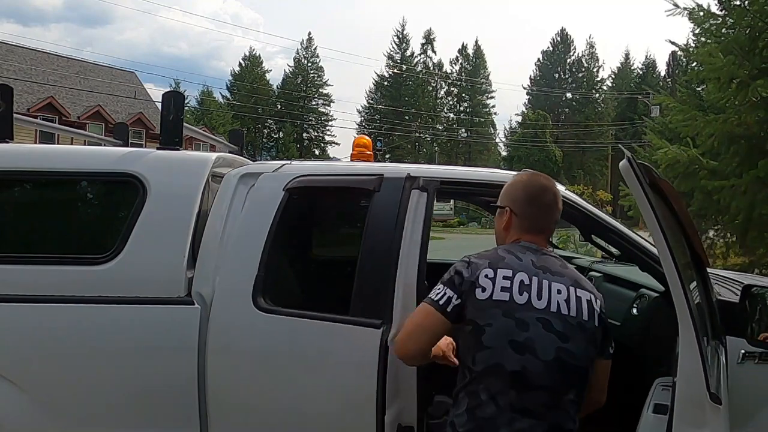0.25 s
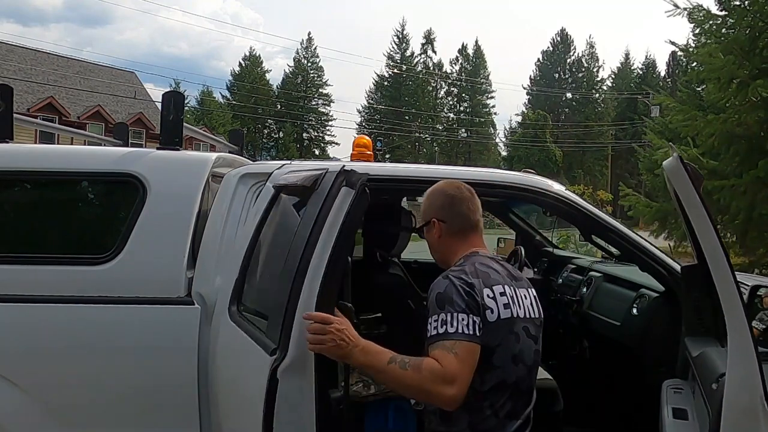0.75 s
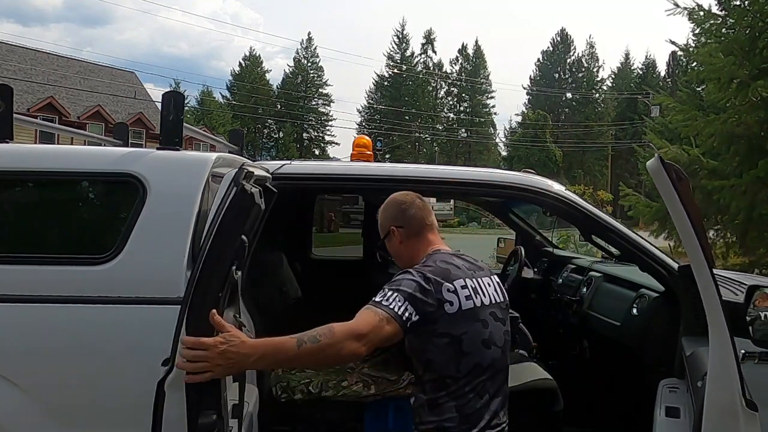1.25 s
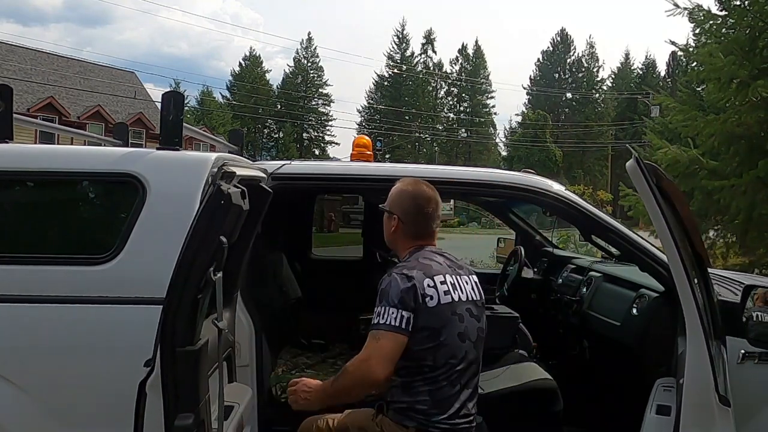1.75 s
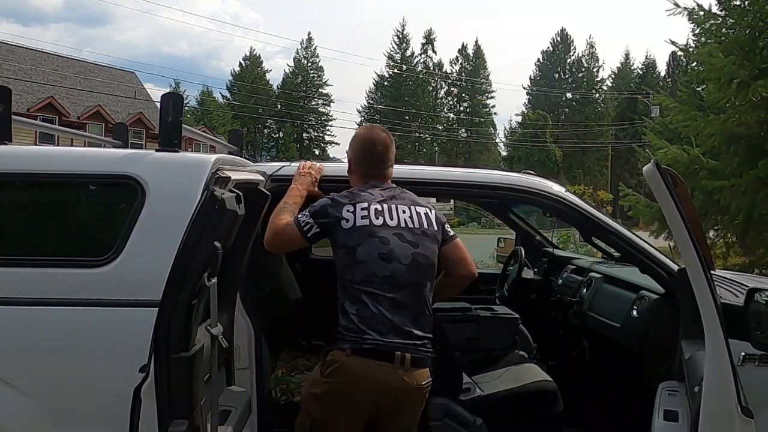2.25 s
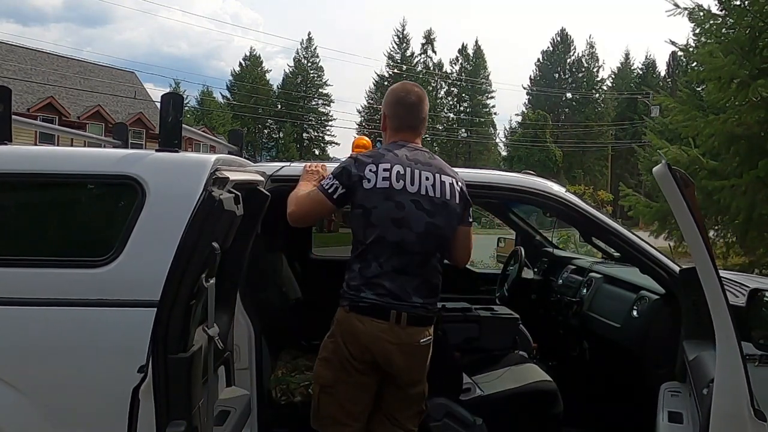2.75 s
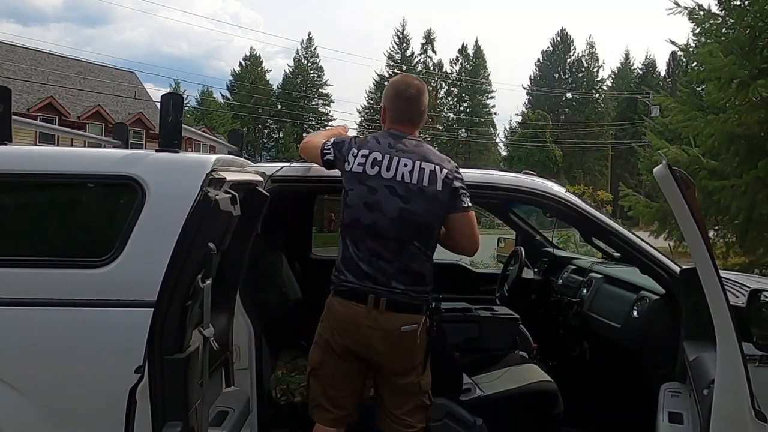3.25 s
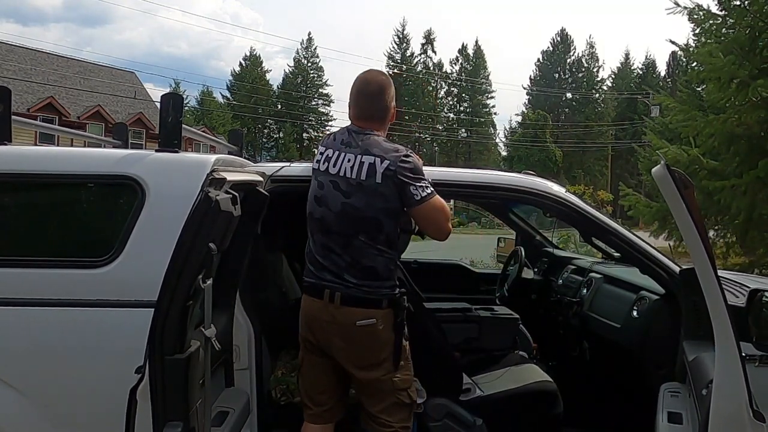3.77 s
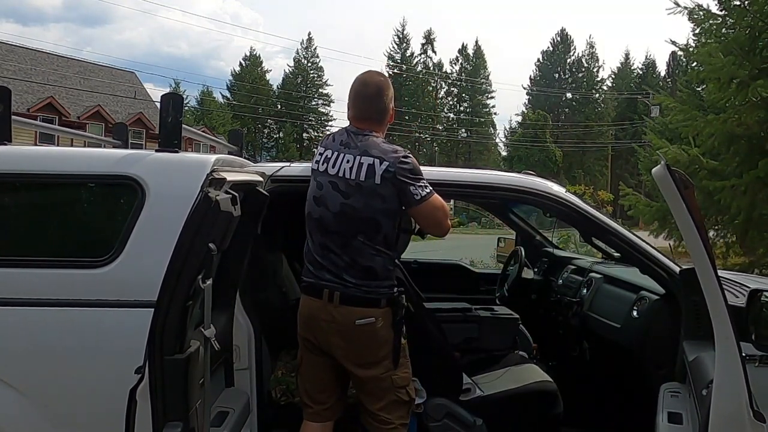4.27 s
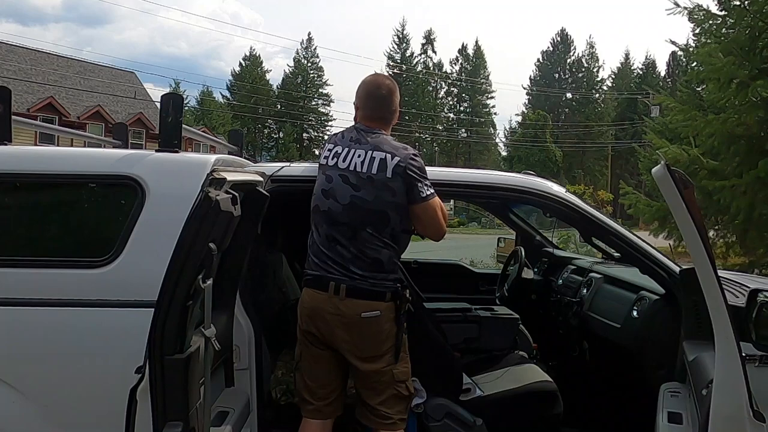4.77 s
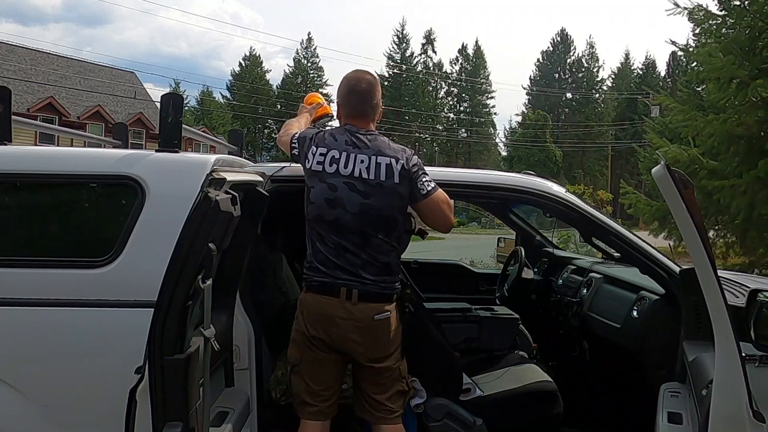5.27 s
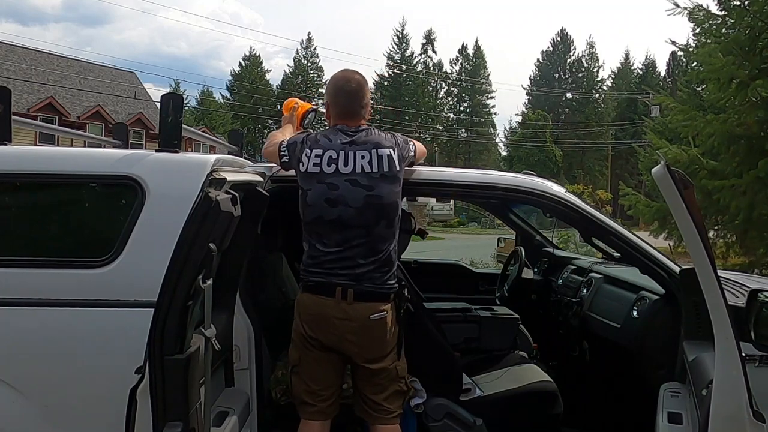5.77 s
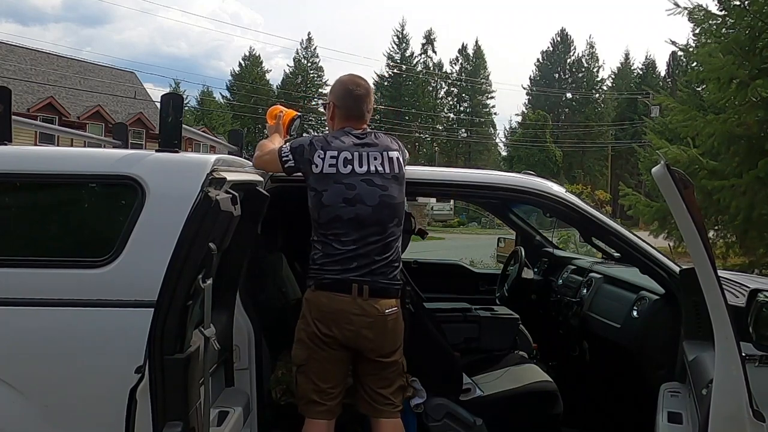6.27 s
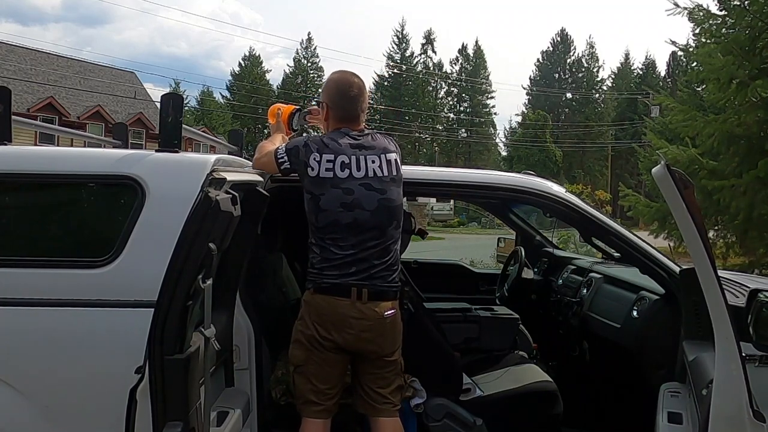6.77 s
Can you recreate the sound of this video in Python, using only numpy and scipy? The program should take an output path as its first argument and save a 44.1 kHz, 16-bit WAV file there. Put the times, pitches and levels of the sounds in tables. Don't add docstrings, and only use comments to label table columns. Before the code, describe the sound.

Heard from a few metres away outdoors: a thud, then the hard double click of a pickup door, small knocks and swishes of cloth. A bright ringing clack lands a little later, followed by scattered hand and boot bumps. Near the end, hollow sheet-metal clunks burst out as a magnet lets go. A low motor drone rises slightly throughout, with soft traffic hiss.

```python
import sys
import numpy as np
from scipy import signal
from scipy.fft import rfft, irfft, next_fast_len
from scipy.io import wavfile
from scipy.ndimage import uniform_filter1d

SR = 44100
rng = np.random.default_rng(int(sys.argv[2]) if len(sys.argv) > 2 else 0)


def output_pcm(signal):
    pcm = np.clip(np.atleast_2d(signal).T, -1, 1) * 32767
    wavfile.write(sys.argv[1], SR, np.round(pcm).astype(np.int16))


def to_linear_factor(level_db):
    exponent = np.asarray(level_db, float) / 20
    return 10 ** exponent


N = 309582
T = np.arange(N) / SR

# (frequency [Hz], level [dB per Hz])
AIR_SPECTRUM = [(15, -27.5), (30, -17), (60, -13.5), (140, -12.5), (200, -20), (300, -24.5), (420, -27.5),
                (700, -33), (1200, -29), (2280, -34.5), (3230, -43.5), (4460, -48), (12000, -76),
                (16000, -110)]
# (frequency [Hz], difference [dB])
FAR_SIDE = [(200, 0), (380, 1), (700, 2.5), (1300, 4.5), (2400, 7.5), (4400, 5), (8100, 1), (15000, 0)]
# (time [s], shaft rate [Hz])
ENGINE_SPEED = [
    (0, 24.1),
    (1.4, 24.06),
    (2, 25.01),
    (2.5, 25.41),
    (3, 25.89),
    (4, 26.14),
    (7.02, 26.39),
]
# (multiple of shaft rate [1], level at the nearest [dB], later fading [dB/s])
STRONG_ORDERS = [(2, -38, 3), (3, -44, 6.5), (3.5, -47, 0.25), (5, -44, 1.6), (6, -53.5, 0.5),
                 (7, -58, 1.4), (8, -68, 0), (10, -59, 12), (10.5, -68, 0), (13.5, -72, 0), (16.5, -69, 5),
                 (19, -73, -0.64)]
# (multiple of shaft rate [1], relative level [dB])
WEAK_ORDERS = [(1, -13.5), (4, -20.5), (9, -33.5), (11, -28), (12, -28.5), (14, -24.5)]
# (time [s], depth [dB])
SHADE_DIPS = [
    (.76, 19),
    (1.26, 12),
]

# (start [s], length [s], level [dB])
MOVEMENTS = [(0.397, 3.4, -83.5), (0.797, 0.17, -74.5), (1.236, 0.027, -83.5), (1.454, 0.074, -72),
             (1.682, 0.16, -69.5), (2.212, 0.3, -70.5), (2.713, .1, -74), (3.1, .06, -75.5),
             (3.389, .04, -84), (3.66, .13, -81.5), (4.942, .8, -80.5), (6.303, 0.064, -75.5),
             (6.724, 0.026, -79), (6.9, .12, -89)]
# (frequency [Hz], level [dB per Hz])
CLOTH_SPECTRUM = [(1200, -16.5), (2500, 6.5), (5000, 0), (8000, -7.5), (12000, -21), (16000, -27)]
# (frequency [Hz], difference [dB])
NEAR_SIDE = [(150, 0), (400, -1), (1300, -1.2), (2400, .5), (4400, -1.5), (8100, -3.5), (15000, -2)]
# (time [s], peak [dB], centre [Hz], width [octaves], t60 [s])
TICKS = [(.745, -53, 4500, 0.88, 0.026), (0.87, -50, 3500, 1.1, .015), (2.281, -32.5, 7970, 1.1, .015),
         (6.735, -46, 2600, 0.58, 0.025), (5.479, -51, 12000, 0.59, .06), (0.884, -34, 2200, 1.9, 0.008),
         (0.893, -36.5, 1980, 1.6, 0.011), (.416, -33.5, 3660, 1.3, 0.029), (1.546, -54, 8100, 0.66, 0.016),
         (1.858, -42, 3300, .9, 0.061), (2.368, -56, 14000, .4, .04), (2.33, -57, 14500, .3, .04),
         (5.48, -56, 14000, .4, .04), (2.2791, -28, 7600, .8, .04), (2.368, -45, 9500, .9, 0.048),
         (3.19, -63, 5250, 0.43, .12), (3.371, -64, 6900, 1.1, .016), (3.699, -58.5, 7200, 1.5, 0.09),
         (5.036, -30, 2300, 2.6, 0.0047), (5.202, -52.5, 9300, 0.76, .06), (5.479, -41, 9000, .8, 0.067),
         (2.329, -47, 12000, .7, .03), (2.272, -46, 11500, .6, .02), (.885, -55, 9000, .8, .012),
         (4.866, -63, 5300, .5, .03), (2.69, -55, 4200, 1, .04), (2.757, -66, 7000, 1.3, .04),
         (0.002, -59, 9000, 1.2, .05), (5.675, -62, 4500, 1.5, .02), (6.335, -41.5, 6100, 1.83, 0.062),
         (6.32, -68, 10500, .7, .05), (6.875, -71, 8800, .65, 0.026), (6.89, -64, 7600, .6, .029),
         (6.898, -58, 6300, 1.1, .016), (6.925, -58.5, 8700, .65, 0.047)]

# (time [s], peak [dB], frequency [Hz], t60 [s])
PINGS = [(0, -32.5, 795, 0.079), (.306, -50, 2570, .03), (.395, -29.5, 699, 0.13), (.396, -33.5, 1483, .1),
         (.417, -31.5, 1060, 0.044), (.417, -29, 738, 0.084), (2.49, -51, 4050, 0.063),
         (2.638, -43, 1160, 0.025), (2.688, -42, 654, 0.048), (2.978, -47.5, 1400, 0.05),
         (3.152, -52, 860, 0.041), (3.7, -57, 4010, 0.11), (4.965, -33.5, 1196, 0.031),
         (4.995, -48, 1790, .06), (.68, -47, 1200, 0.027), (5.037, -25, 1256, .018),
         (5.205, -23.5, 858, 0.11), (5.4785, -13, 1800, 0.008), (5.466, -28, 1500, .04),
         (2.273, -26, 1650, .03), (2.2795, -17, 1900, .035), (2.329, -36, 1700, .05),
         (2.33, -37, 2300, .07), (2.367, -37, 2400, .05), (.885, -46, 1150, .02), (.395, -32, 770, .04),
         (.742, -50, 430, .06), (2.598, -50, 400, .05), (2.002, -48, 1650, .03), (2.638, -50, 760, .03),
         (3.153, -50, 1650, .03), (1.858, -50, 4400, .04), (5.785, -58, 2900, .03),
         (6.735, -43, 2560, 0.026)]
# (frequency [Hz], level [dB], t60 [s])
STRIKER_MODES = [(1157, -5.5, .13), (1437, -0.5, .09), (1840, 1, 0.011), (2277, -4, .09), (3090, -12, .15),
                 (3348, -12, .11), (4016, -7, 0.11), (4549, -7, .06), (5071, -13, .09), (5717, -5, .046),
                 (6040, -11, .07), (7413, -20, .1), (8597, -23, .1), (9378, -27, .14)]
# (frequency [Hz], level [dB], t60 [s])
BUCKLE_MODES = [(921, 0, .07), (2842, -12, .2), (3343, -2, .08), (3844, -7, .084), (4549, -8, .1),
                (5157, -8, .088), (5922, -8, .087), (8323, -14, .083)]
# (time [s], peak [dB], upper modes [dB])
BUCKLE_BOUNCES = [
    (2.328, -38, 1),
    (2.334, -40, 2),
    (2.3666, -36, 1.5),
]
# (frequency [Hz], level [dB], t60 [s])
HANDLE_MODES = [(705, 0, .15), (1114, -5, .12), (1281, -7, .13), (2304, -16, .15), (2503, -8, .097),
                (2853, -11, .12), (3047, -13, .12), (3935, -13, .094), (4630, -17, .12)]
# (time [s], peak [dB], upper modes [dB])
HANDLE_PULLS = [
    (.3955, -34, 0),
    (.416, -36, -2),
]
# (frequency [Hz], level [dB], t60 [s])
BASE_MODES = [(468, -6, .25), (759, -10, .15), (890, -4, .09), (1077, -6, .15), (1238, -6, .09),
              (2040, -8, .08), (2250, -14, .14), (2632, -6, .07), (2778, -11, .09), (3015, -9, .055),
              (3418, -11, .08), (3553, -15, .1), (3830, -15, .08), (4436, -20, .1)]
# (time [s], peak [dB], upper modes [dB])
BASE_ROCKS = [(5.02, -33, -6), (5.048, -33, -12), (5.203, -26, -4), (5.225, -29, -8), (5.408, -24, -3),
              (5.42, -21, -13), (5.443, -30, 0), (5.462, -27, -3), (5.479, -30, 6), (5.486, -30, 4),
              (5.518, -31, -1)]
# (frequency [Hz], level [dB], t60 [s])
MAGNET_MODES = [(9383, 0, .17), (9394, -9, .22), (10920, -14, .05), (11510, -18, .04), (11830, -20, .05),
                (13290, -36, .3), (14620, -19, .4)]

# (time [s], peak [dB], frequency [Hz], t60 [s])
THUDS = [(0, -24.5, 130, 0.17), (0, -19.5, 263, 0.024), (.03, -38, 330, .2), (.02, -37.5, 207.6, 0.43),
         (2.08, -31.5, 48.3, 0.77), (2.75, -38.5, 34.6, 0.54), (5.21, -30, 497, .12),
         (5.495, -21, 305, 0.16), (5.485, -16, 122, .1), (5.474, -23, 225, .06), (5.495, -24, 195, .12),
         (5.52, -27, 155, .15), (5.515, -23, 320, .09), (5.225, -30, 140, .12), (2.284, -32, 500, .06),
         (2.29, -30, 92, .12), (2.375, -32, 90, .1), (.46, -37, 140, .35), (.48, -45, 320, .25),
         (.362, -40, 330, .05), (.08, -42, 220, .2), (4.998, -33, 210, .08), (5.497, -19, 358, .1),
         (5.464, -27, 330, .05), (5.085, -24, 122, .09), (5.205, -29, 125, .08), (5.405, -31, 335, .08),
         (5.205, -35, 312, .1), (5.02, -35, 250, .2), (2.285, -31, 340, .1), (2.785, -32, 92, .12)]
# (frequency [Hz], level [dB], t60 [s])
DOOR_LOW_MODES = [(96, 2.5, 0.14), (155, 3, 0.13), (209, -12, 0.37), (251.6, -6.5, .22), (310, -11.5, .16)]
# (time [s], peak [dB], upper modes [dB])
DOOR_SPRINGS = [
    (.404, -24, 0.2),
    (.436, -27, -6.5),
]
# (frequency [Hz], level [dB], t60 [s])
CAB_MODES = [(56, 0.5, 0.4), (49.5, -9.5, 0.33), (109, -1, 0.21), (163, -8, 0.38), (198.4, -12.5, 0.41)]
# (time [s], peak [dB], upper modes [dB])
ROOF_FLEXES = [
    (5.018, -30, -4),
    (5.086, -15.5, -8),
    (5.209, -15, -15),
    (5.406, -19.5, -9),
    (5.488, -12.5, -10),
    (6.146, -26, -20),
]
# (frequency [Hz], level [dB], t60 [s])
DOOR_MODES = [(324.5, -6.5, 0.016), (460, -10, 0.043), (770, -21.5, 0.072), (880, -15, 0.12),
              (1079, -7.5, 0.1), (1220, -22, 0.15), (1403, -20.5, 0.079), (1488, -14, 0.09)]
# (frequency [Hz], level [dB], t60 [s])
ROOF_MODES = [(319.6, -6.5, 0.094), (361.5, -7, 0.091), (475.4, -13.5, 0.24), (525, -13.5, 0.15),
              (609, -20, 0.2), (665, -20, 0.082), (912, -27, 0.093), (887, -16, 0.31), (1020, -8, 0.093),
              (1062, -0.5, 0.076), (1200, -18, 0.14), (1400, -14, 0.23), (774, -22.5, 0.087),
              (1856, -17.5, 0.2)]

# (time [s], crack [dB], relative panel [dB], relative top [dB], t60 [s])
LATCHES = [(0.0018, -37, 16.5, -11, 0.093), (0.352, -45, -2, -23, 0.14), (0.3643, -36, 1.5, -22, 0.068),
           (0.3945, -27, 1.5, -8.5, 0.057), (0.4144, -29, -6, -32, 0.076), (0.886, -37, -36, -22, 0.016),
           (0.8938, -45.5, -25, -9, 0.11), (2.272, -25, -12, -11.5, 0.061),
           (2.2789, -18, -11.5, -2.5, 0.085), (2.2863, -24, -19, 2.5, 0.098), (2.3273, -32, -24, 1.5, 0.14),
           (2.3663, -33, -20, 4, 0.11), (2.7389, -37, -1, -18, 0.082), (2.755, -37, 1, -55, 0.056),
           (3.699, -53, -12, 4, 0.17), (4.965, -37.5, -14, -21, 0.044), (6.3346, -49, -4, 6, 0.12)]
# (time [s], crack [dB], relative panel [dB])
BUMPS = [(0.3055, -45.5, -23), (0.68, -46.5, -13), (1.005, -41.5, -24), (1.6729, -44, 9.5),
         (1.8583, -46.5, -32), (2.637, -51, -8), (2.6767, -46.5, -11), (2.6848, -43.5, 3),
         (3.1518, -41.5, -7), (3.5934, -47, -13.5), (6.3935, -55, 5.5)]
# (time [s], crack [dB], relative panel [dB])
TAPS = [(0.7399, -49, 13.5), (1.5463, -51, 1), (2.0025, -43, -7), (2.0444, -54.5, -5), (2.1909, -54, 4),
        (2.2311, -46, -15.5), (2.49, -46, -19), (2.544, -54, -10), (2.7864, -61, -5), (2.8535, -55.5, -16),
        (2.9776, -51, -2), (3.247, -56, -6.5), (3.3711, -50, -17), (4.8575, -58.5, 11), (6.735, -55, -2),
        (6.9029, -57, -10), (7.008, -51, 0)]
# (time [s], crack [dB], relative panel [dB], relative top [dB], t60 [s])
CLUNKS = [(5.0025, -47, 2, -19, 0.12), (5.011, -35.5, 6.5, -14, 0.19), (5.0299, -38, 5, -14, 0.057),
          (5.0359, -27.5, -7.5, -20, 0.032), (5.079, -39, 4, -12.5, 0.23), (5.1, -51, -2, -16.5, 0.18),
          (5.2027, -28.5, -1, -14.5, 0.12), (5.2122, -37.5, -2, -9.5, 0.085),
          (5.2246, -30.5, -3.5, -55, 0.1), (5.262, -48.5, 2, -28, 0.23), (5.362, -51, 3, -6, 0.36),
          (5.385, -44, 2, -25, .1), (5.403, -28, 4, -11.5, 0.04), (5.409, -28, -1.5, -20, 0.12),
          (5.443, -27.5, -3.5, -15, 0.19), (5.4783, -23, -7.5, -5, 0.16), (5.492, -27, 2, -12, 0.061),
          (5.5017, -30, -2, -18, 0.038), (5.519, -36, 0, -16, .18)]
BANDS_HZ = 180 * 2 ** np.arange(0, 6.6, .5)


def unit(x):
    return x / np.sqrt(np.mean(x ** 2))


def low_part(x, hz):
    return signal.sosfiltfilt(signal.butter(1, hz, fs=SR, output="sos"), x)


def band(x, lo_hz, hi_hz):
    return signal.sosfilt(signal.butter(2, [lo_hz, min(hi_hz, SR / 2.1)], "band", fs=SR, output="sos"), x)


def walk(rate):
    k = int(SR / rate)
    held = np.repeat(rng.standard_normal(N // k + 1), k)
    return 0.908 * uniform_filter1d(uniform_filter1d(held, k), k)[:N]


def ports(alike_hz, share):
    mid, side = rng.standard_normal((2, N))
    side = share * signal.lfilter(*signal.butter(1, alike_hz, "high", fs=SR), side)
    return np.array([mid + side, mid - side])


def coloured(x, points):
    hz, db = np.transpose(points)
    size = next_fast_len(N)
    f = np.maximum(np.arange(size // 2 + 1) * SR / size, 1)
    gain = to_linear_factor(np.interp(np.log(f), np.log(hz), db))
    return irfft(rfft(x, size) * gain, size)[..., :N]


def placed(x, side):
    return np.array([coloured(c, [(hz, sign * db / 2) for hz, db in side]) for c, sign in zip(x, (1, -1))])


def air():
    noise = coloured(ports(1300, share=1), AIR_SPECTRUM)
    noise = noise * to_linear_factor(-60.5) / np.std(band(noise, 400, 3000))
    hiss_db = 3 - 3.5 / (1 + np.exp((3.18 - T) / 0.37))
    bass = low_part(noise, 450)
    return bass * to_linear_factor(4 + 0.55 * walk(8.7)) + (noise - bass) * to_linear_factor(hiss_db + 0.29 * walk(2.4))


def tone(hz, db, flutter_db):
    phase = 2 * np.pi * (np.cumsum(hz) / SR + rng.random()) + .1 * walk(6)
    lead = np.outer([-1, 1], hz / 3000)
    return np.sqrt(2) * to_linear_factor(db + flutter_db * walk(5)) * np.sin(phase + lead)


def engine():
    nearest_s, approach_db_per_s = 1.37, 2
    shaft_hz = np.interp(T, *np.transpose(ENGINE_SPEED))
    coming_db = approach_db_per_s * np.maximum(nearest_s - T, 0)
    gone_s = np.maximum(T - nearest_s, 0)
    null_db = sum(depth * np.exp(-((T - s) / 0.085) ** 2) for s, depth in SHADE_DIPS)
    out = np.zeros((2, N))
    for k, db, fade in STRONG_ORDERS:
        out += tone(k * shaft_hz, db - coming_db - fade * gone_s - null_db * (k == 5), flutter_db=2.6)
    for k, db in WEAK_ORDERS:
        out += tone(k * shaft_hz, db - 39.5 - coming_db - 1.95 * gone_s, flutter_db=2.5)
    return out


def fan():
    on_s, climb_db_per_s = 6.1, 9.5
    hz = 151.3 + .4 * walk(1.5)
    db = -45.5 - climb_db_per_s * np.maximum(on_s - T, 0)
    return tone(hz, db, flutter_db=1.2) + tone(2 * hz, db - 17, flutter_db=2.5)


def rustle():
    rise_db_per_s, fall_db_per_s, still_db = 93.5, 91.5, -93.5
    grains = ports(3000, share=.7) * to_linear_factor(1.7 * walk(900) + 1.7 * walk(34))
    power = to_linear_factor(2 * still_db)
    for s, length, db in MOVEMENTS:
        before_db = rise_db_per_s * np.maximum(s - T, 0)
        after_db = fall_db_per_s * np.maximum(T - s - length, 0)
        power = power + to_linear_factor(2 * (db - before_db - after_db))
    return unit(coloured(grains, CLOTH_SPECTRUM)) * np.sqrt(power) * to_linear_factor(8)


def ticks():
    out, t = np.zeros((2, N + SR)), T[:SR // 5]
    grit = ports(5000, share=.5) * to_linear_factor(3 * walk(1200))
    pan_db = np.array([[-1.3], [1.3]]) / 2
    for s, db, hz, octaves, t60 in TICKS:
        i = int(s * SR)
        lo_hz, hi_hz = hz * 2 ** (-octaves / 2), hz * 2 ** (octaves / 2)
        burst = grit[:, abs(i - len(t)):][:, :len(t)] * to_linear_factor(-60 * t / t60)
        burst = band(band(burst, lo_hz, hi_hz), lo_hz, hi_hz)
        burst = burst * np.sqrt(SR / 2 / (hi_hz - lo_hz))
        out[:, i:i + len(t)] += burst * to_linear_factor(db + pan_db)
    return out[:, :N]


def ring(x, modes):
    out = 0
    for k, (hz, db, t60) in enumerate(modes):
        pole = np.exp((2j * np.pi * hz - np.log(1000) / t60) / SR)
        out = out + (-1) ** k * to_linear_factor(db) * signal.lfilter([1], [1, -pole], x).imag
    return out


def magnet():
    tap = np.zeros(N)
    tap[int(5.037 * SR)] = to_linear_factor(-40)
    return ring(tap, MAGNET_MODES) * to_linear_factor(3.9 * walk(67)) * to_linear_factor(np.array([[.8], [-.8]]))


def swings(events, push_cycles):
    out = np.zeros(N + SR)
    for s, db, hz, t60 in events:
        t, i = T[:int(t60 * SR)], int(s * SR)
        push = 1 - np.exp(-t * hz / push_cycles)
        out[i:i + len(t)] -= to_linear_factor(db - 60 * t / t60) * push * np.sin(2 * np.pi * hz * t)
    return out[:N]


def blows(events, modes):
    split_hz = 1.5 * modes[0][0]
    return [(s, db + mode_db + upper_db * (hz > split_hz), hz, t60)
            for s, db, upper_db in events for hz, mode_db, t60 in modes]


def small_parts():
    events = PINGS + blows([(2.28, -20.5, 0)], STRIKER_MODES) + blows(BUCKLE_BOUNCES, BUCKLE_MODES)
    events = events + blows(BASE_ROCKS, BASE_MODES) + blows(HANDLE_PULLS, HANDLE_MODES)
    return swings(events, push_cycles=0.733)


def boom():
    out = swings(THUDS + blows(DOOR_SPRINGS, DOOR_LOW_MODES), push_cycles=0.42)
    out = out + swings(blows(ROOF_FLEXES, CAB_MODES), push_cycles=1.5)
    return np.array([np.roll(out, 4), out])


def knocks(events, gain_db, snap_db, air_db, slope, rise_s, chatter_db, tail_db, tail_s):
    grit = unit(ports(3500, share=.45) * to_linear_factor(chatter_db * walk(1200)))
    out, t = np.zeros((2, N)), T[:SR // 4]
    colour_hz = [150, 450, 900, 2000, 3300, 6500, 9000, 17000]
    for k, hz in enumerate(BANDS_HZ):
        power, snaps = np.zeros((2, 2, N + len(t)))
        rise = (1 - np.exp(-t * hz / 2000 / rise_s)) ** 2
        for s, db, panel_db, top_db, t60, pan_db in events:
            colour_db = [panel_db - 8, panel_db, min(panel_db / 2, 2), 0,
                         0.24 * top_db, top_db, top_db + 0.34 * air_db, top_db + air_db]
            colour = np.interp(np.log(hz), np.log(colour_hz), colour_db)
            fall = max(t60, .01) * (hz / 2000) ** -slope
            body = np.exp(-t * np.log(1e6) / fall)
            tail = to_linear_factor(2 * tail_db) * np.exp(-t * np.log(1e6) / (fall + tail_s))
            side = np.clip(pan_db * hz / 8000, -4, 4)
            gain = to_linear_factor(db + colour + gain_db + np.array([side, -side])) * np.sqrt(SR / hz)
            i = int(s * SR)
            power[:, i:i + len(t)] += np.outer(gain ** 2, rise * (body + tail))
            snaps[:, i] += gain * to_linear_factor(snap_db) * np.sqrt(SR / hz)
        struck = np.sqrt(power[:, :N]) * grit + snaps[:, :N]
        out += (-1) ** k * band(struck, hz * 2 ** -.25, hz * 2 ** 0.2)
    return out


def door_knocks():
    contacts = [(*row, 0) for row in LATCHES]
    contacts += [(*row, -33, 0.064, 3) for row in BUMPS]
    contacts += [(*row, -2, 0.068, 0) for row in TAPS]
    hits = knocks(contacts, gain_db=-9.5, snap_db=-1, air_db=-32.5, slope=0.31, rise_s=0.00034,
                  chatter_db=3.5, tail_db=-17, tail_s=0.21)
    return hits + to_linear_factor(-46.5) * ring(hits.mean(axis=0), DOOR_MODES)


def beacon_clunks():
    hits = knocks([(*row, 0.7) for row in CLUNKS], gain_db=-5.5, snap_db=0.5, air_db=-33.5, slope=0.49,
                  rise_s=0.00074, chatter_db=2.5, tail_db=-18.5, tail_s=0.32)
    return hits + to_linear_factor(-39.5) * ring(hits.mean(axis=0), ROOF_MODES)


def scene():
    far = placed(air(), FAR_SIDE) + engine() + fan()
    parts = small_parts() + ticks() + magnet()
    truck = rustle() + parts + boom() + door_knocks() + beacon_clunks()
    return far + placed(truck, NEAR_SIDE)


def low_pass(x):
    return signal.sosfilt(signal.butter(12, 15870, fs=SR, output="sos"), x)


def record(dry):
    dry = signal.sosfilt(signal.butter(2, 27, "high", fs=SR, output="sos"), dry)
    body = low_part(dry[0], 9500)
    left = dry[0] - body + np.roll(body, 1)
    return low_pass(np.array([left, dry[1]]))


dry = scene()
out = record(dry)
output_pcm(out)
```